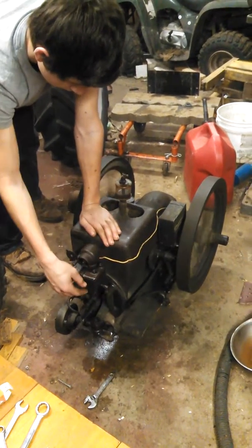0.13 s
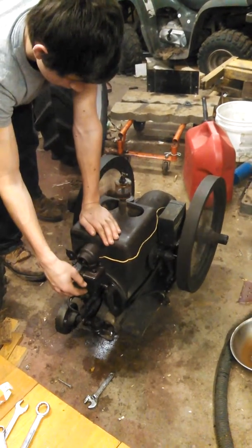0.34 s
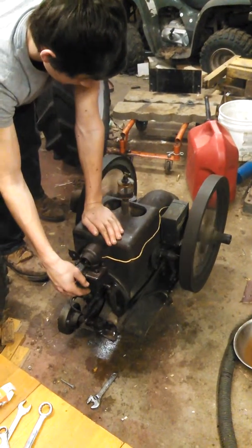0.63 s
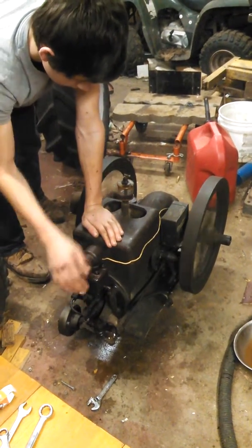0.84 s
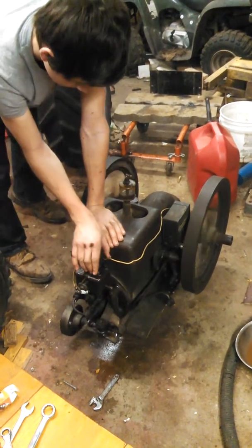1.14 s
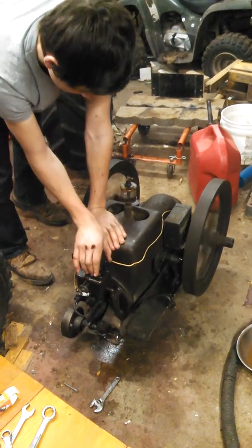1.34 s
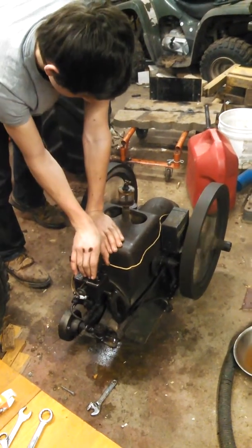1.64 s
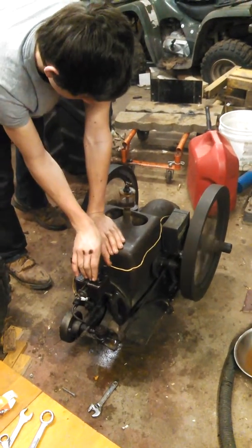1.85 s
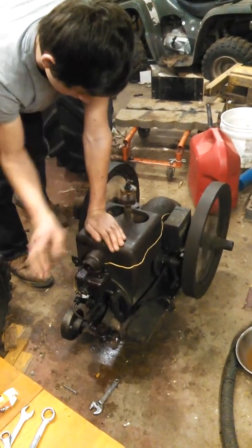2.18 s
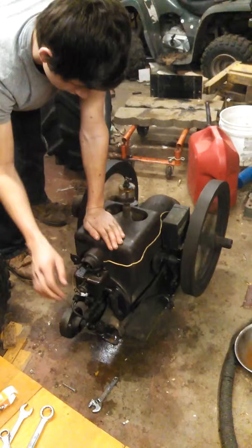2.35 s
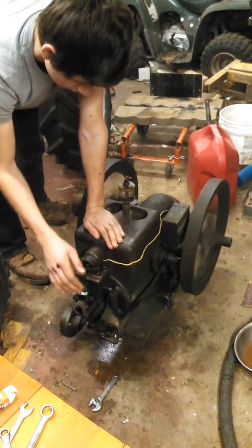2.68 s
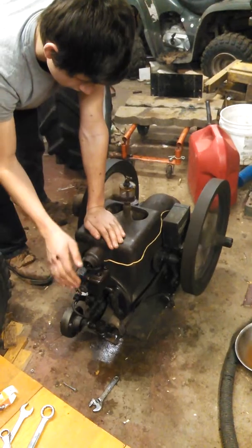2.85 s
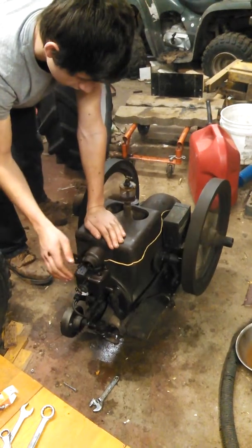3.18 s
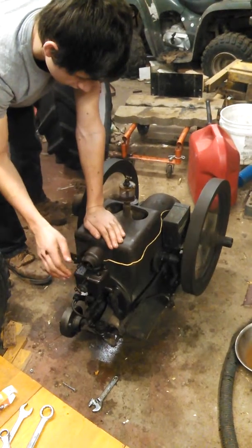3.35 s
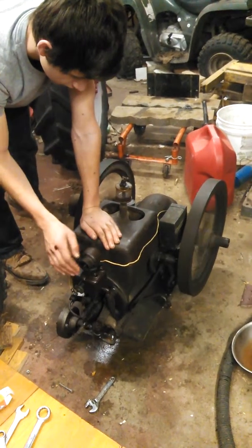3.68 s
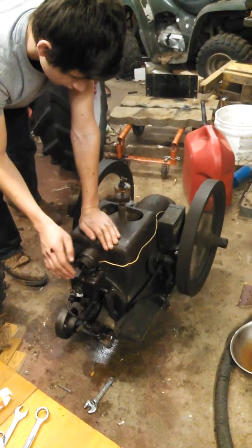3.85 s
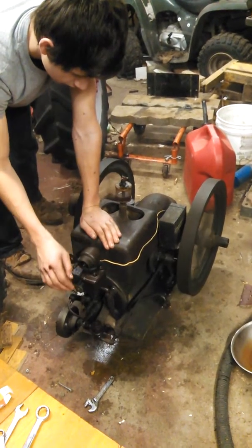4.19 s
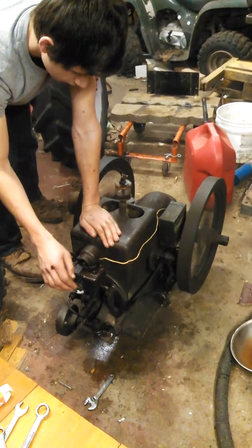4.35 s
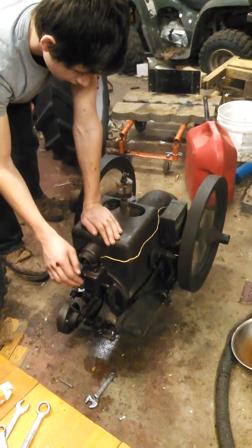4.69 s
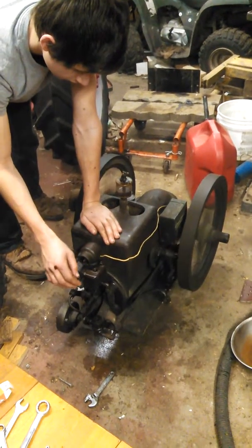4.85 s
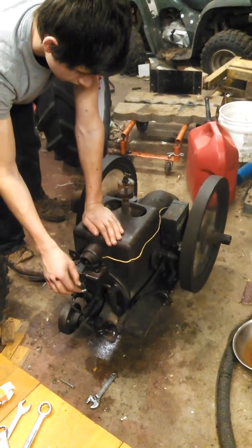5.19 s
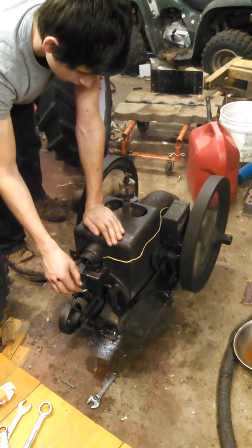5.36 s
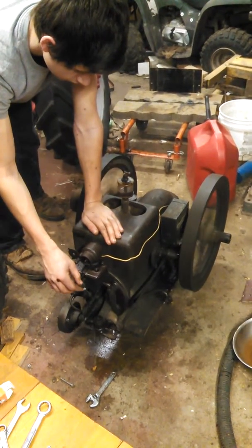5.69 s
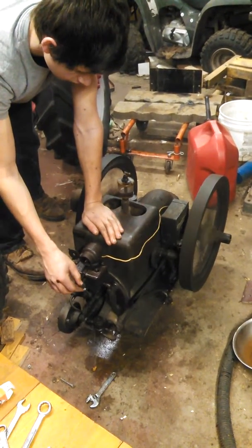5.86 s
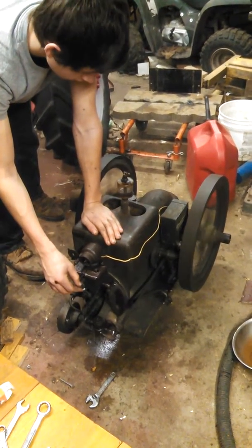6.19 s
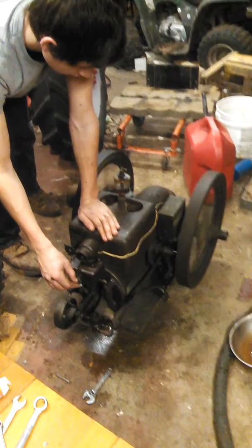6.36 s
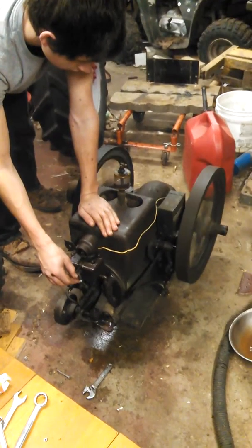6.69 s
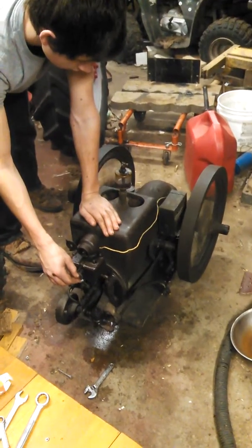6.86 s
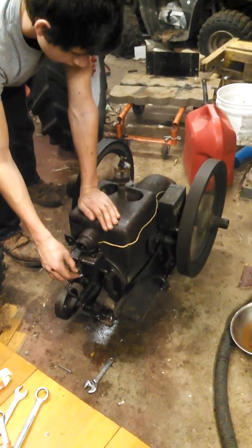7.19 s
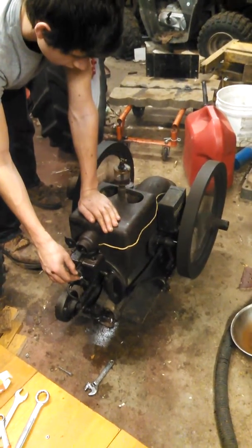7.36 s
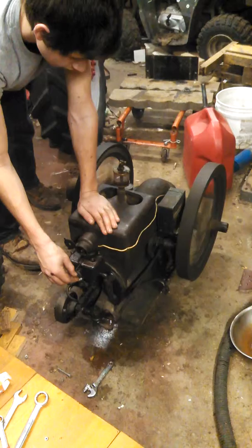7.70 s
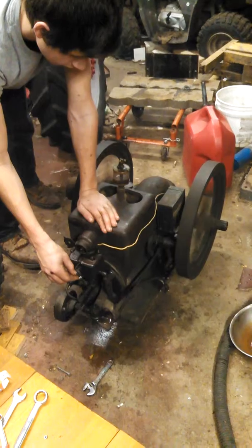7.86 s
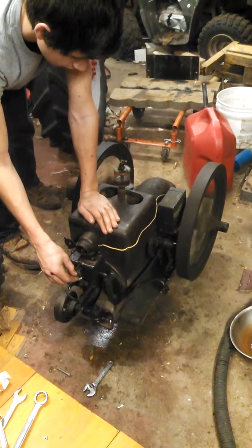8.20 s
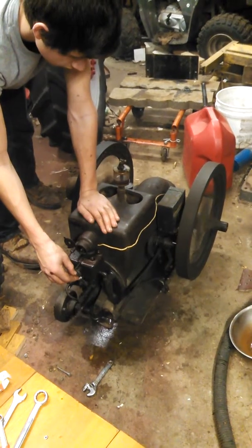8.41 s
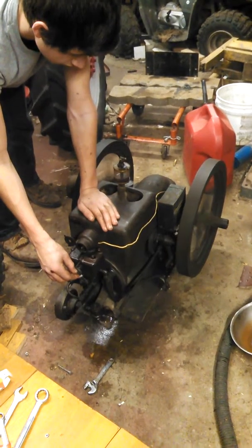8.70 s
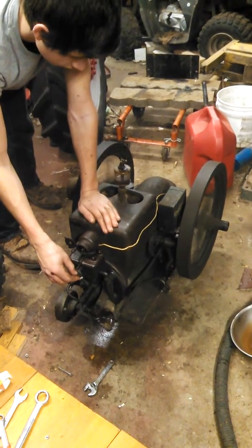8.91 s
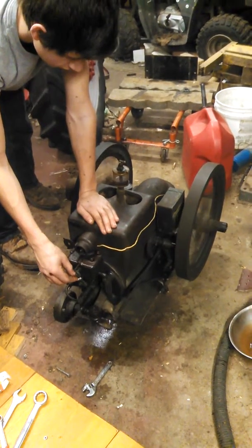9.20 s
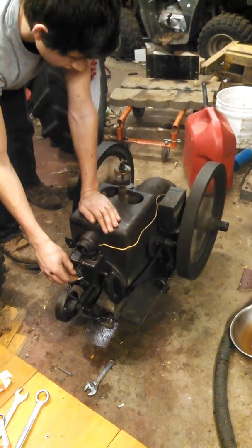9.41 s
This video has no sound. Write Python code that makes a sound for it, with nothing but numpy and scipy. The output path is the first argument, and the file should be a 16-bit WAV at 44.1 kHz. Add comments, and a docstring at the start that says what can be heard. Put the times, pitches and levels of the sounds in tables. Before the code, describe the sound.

Close view of a small old flywheel engine in a hard, echoing garage. Gears rattle, a push rod clacks each turn with a low puff, valves hiss and spit, the intake gulps. It slows for two seconds, then loud dry cracks with iron ringing push it quicker, until it fires only about every fourth cycle. Each crack ducks the clatter, which creeps back.

```python
"""In a garage, a small antique hit-and-miss engine runs on the floor, near a camera.
Once a cycle its valve gear knocks and the exhaust puffs; in some cycles the intake gulps shortly before.
Gears clatter and air hisses at the valves: noise with colour and ringing. Puffs and gulps are short swings of pressure.
The flywheel coasts and slows, then sharp firings kick it up to speed, and it ends firing every fourth cycle.
Loud cracks duck the camera's gain, so the clatter drops away and swells back between firings."""
import sys
import numpy as np
from scipy import signal
from scipy.fft import rfft, irfft, next_fast_len
from scipy.io import wavfile
from scipy.ndimage import uniform_filter1d, map_coordinates

SR = 44100
rng = np.random.default_rng(int(sys.argv[2]) if len(sys.argv) > 2 else 0)


def wav_out(sig):
    """Save sig, one row per channel (or a flat mono array), as 16-bit PCM at SR to the path in sys.argv[1]."""
    wavfile.write(sys.argv[1], SR, np.round(np.clip(np.atleast_2d(sig).T, -1, 1) * 32767).astype(np.int16))


N = 420713
TIME = np.arange(N) / SR

# All levels are relative: the functions below still weigh and mix them.

# room echo: [f/Hz, time to fall by 60 dB/s]
ROOM_DECAY = [(80, 0.34), (300, 0.43), (1500, 0.36), (4000, 0.21), (8000, 0.24), (15000, 0.15)]
# steady gear clatter: [t/s, level/dB]
CLATTER_LEVEL = [(0, -32), (1.7, -31.5), (2.3, -34), (3.0, -31), (4.4, -28.5), (7.4, -29), (9.5, -29.5)]
# colour of the gear clatter: [f/Hz, level per Hz/dB]
GEAR_COLOUR = [(30, -42), (48, -50), (72, -3.5), (110, -2), (150, -0.5), (260, 1), (480, -7), (800, -3),
               (1400, -7.5), (2000, -4.5), (4500, -17), (7000, -17), (10000, -29.5), (15000, -27.5)]
# resonances of gears and casting: [f/Hz, width/Hz, level/dB]
CASTING_MODES = [(420.4, 21, -4), (630, 9.8, -10.5), (840, 26, -11), (997, 58, -13), (1212, 30, -8.5),
                 (1342, 62, -3), (1385, 91, -2), (1670, 15, -7), (1937, 29, -9), (2370, 160, -2.5),
                 (5136, 220, 5.5)]
# slack in the linkage, taken up in every cycle: [part of a cycle after the knock, level/dB]
SLACK_TICKS = [(0.583, -33), (.635, -38.5), (.79, -34.5)]
# air leaking past the valves, swelling until 4.3 s and then dying away:
# [t/s, hiss level/dB, fine spray level/dB]
LEAK_LEVEL = [(0, -39, -50), (1.1, -37, -44), (2.3, -37.5, -41), (4.298, -30.5, -36), (4.8, -33.5, -48),
              (9.5, -42.5, -54)]
# spits of fine spray at the intake, long while a hand covers it: [t/s, level/dB, length/s]
INTAKE_SPRAYS = [(1.35, -36.5, 0.076), (1.696, -35, 0.081), (2.046, -34, 0.055), (3.859, -26, .008)]
# colours of hissing air and of a fine spray of air: [f/Hz, level per Hz/dB]
HISS_COLOUR = [(1000, -13), (3000, 0), (4500, 3), (6500, -0.5), (8000, -4.5), (10000, -13.5), (12500, -45),
               (15000, -40)]
SPRAY_COLOUR = [(3000, -17), (8000, 7.5), (10500, -9.5), (12500, 1.5), (15000, 3)]
# sharp spits of air as a valve lifts or seats: [t/s, level/dB]
VALVE_SPITS = [(.044, -32.5), (.06, -30), (.133, -37), (0.159, -34.5), (.357, -30), (.381, -30),
               (.473, -34), (.672, -28.5), (.692, -25), (.766, -37), (.795, -29), (1.006, -34),
               (1.027, -29.5), (1.128, -32), (1.441, -34), (1.473, -34.5), (1.829, -30.5), (2.08, -24.5),
               (2.347, -31), (2.648, -24.5), (2.935, -27), (3.214, -22.5), (3.482, -24), (3.741, -25),
               (3.989, -27), (4.226, -22.5), (4.461, -28)]
# colour of those spits: [f/Hz, level per Hz/dB]
SPIT_COLOUR = [(1500, -30), (4000, 0), (6500, 3.5), (8000, -1.5), (10000, -18), (12500, -23), (15000, -18)]
# gulps of the intake valve: [t/s, level/dB]
INTAKE_GULPS = [(.196, -21), (.514, -22), (.834, -20.5), (1.17, -30), (1.51, -24), (2.183, -31),
                (4.34, -23.5), (4.785, -24), (5.229, -26), (7.05, -23)]
# colour of the air drawn in: [f/Hz, level per Hz/dB]
DRAW_COLOUR = [(90, -28), (170, -8), (340, -10), (500, -15.5), (1500, -11.5), (4000, -20), (12000, -64)]
# strokes of the valve gear, one a cycle: [t/s, knock level/dB, exhaust puff level/dB]
STROKES = [(-.012, -26.5, -21.5), (.286, -25.5, -19.5), (.604, -24, -18), (0.931, -23.5, -15),
           (1.268, -26, -16), (1.618, -25.5, -16.5), (1.961, -28, -21), (2.275, -26, -20.5),
           (2.575, -25, -21.5), (2.872, -27, -20), (3.155, -23, -20), (3.423, -24.5, -19.5),
           (3.684, -25, -22.5), (3.935, -24, -21), (4.177, -21.5, -21.5), (4.407, -22.5, -21),
           (4.634, -24, -29), (4.853, -22.5, -21), (5.07, -23.5, -19.5), (5.279, -22.5, -24),
           (5.485, -23.5, -21), (5.692, -22, -24.5), (5.895, -25.5, -28), (6.099, -24, -24),
           (6.297, -24, -27), (6.497, -23, -24.5), (6.698, -25.5, -29), (6.899, -24.5, -23.5),
           (7.105, -24.5, -20.5), (7.309, -23, -25), (7.514, -23.5, -24), (7.723, -25, -25),
           (7.929, -24, -27), (8.139, -23, -26), (8.348, -22.5, -28), (8.558, -26, -23.5),
           (8.765, -23.5, -25), (8.976, -24.5, -26), (9.189, -23, -24.5), (9.404, -28, -30)]
# one stray knock just before the engine catches: [t/s, level/dB]
LONE_KNOCK = (1.846, -30.5)
# colour of a knock: [f/Hz, level per Hz/dB]
KNOCK_COLOUR = [(60, -43), (150, 0), (480, -3.5), (750, 5), (1400, -1), (1800, -1.5), (2400, -3),
                (3200, -3.5), (5000, -18.5), (8000, -38), (15000, -44)]
# resonances of the exhaust passage and floor: [f/Hz, width/Hz, level/dB]
PIPE_MODES = [(73.5, 7.2, 0.5), (89, 8.6, 4.5), (131.2, 12, 1.5), (158.6, 21, -1), (196.4, 42, -1.5),
              (316, 44, 0)]
# firings: [t/s, speed gained/(cycles per s), crack level/dB, time the gas takes to blow out/s,
# ring level/dB, f of the strongest ring/Hz, whistle level/dB]
FIRING_EVENTS = [(1.88, .532, -7, .016, -23, 3880, -30), (2.511, 0.37, -7, .018, -19, 4280, -33),
                 (3.087, 0.39, -8, 0.021, -10.5, 4255, -12), (3.624, 0.46, -7, .019, -11.5, 3750, -27),
                 (4.12, 0.42, -6, .019, -11, 3970, -8.5), (4.58, 0.41, -6, .02, -11, 4300, -11),
                 (5.015, 0.3, -6.5, .019, -11, 3650, -26), (5.436, .211, -4.5, 0.014, -22, 4300, -25),
                 (5.842, 0.16, -7, 0.014, -11, 4260, -16), (6.245, .128, -6.5, 0.013, -11.5, 4240, -28),
                 (6.648, .071, -6, .014, -13, 3850, -31), (7.667, 0.11, -5.5, .012, -6.5, 4300, -26),
                 (8.503, .1626, -6.5, 0.014, -10, 4400, -32), (9.349, 0.13, -6, .014, -12, 4270, -24)]
# iron ringing under each crack: [f/Hz, width/Hz, level/dB]
IRON_MODES = [(1840, 120, -11), (3240, 18, -11), (3470, 37, -4), (3696, 27, -2.5), (3806, 38, -1.5),
              (3980, 35, -1), (4270, 55, 3), (4344, 58, 0), (4990, 62, -2)]
# colours of the crack and of the snap that opens it: [f/Hz, level per Hz/dB]
CRACK_COLOUR = [(100, -21), (300, -1.5), (900, -1), (1800, 2), (2400, -2), (3000, 6), (4200, 2), (5200, 8),
                (7000, -1.5), (8500, -8), (10000, -12.5), (12500, -12.5), (15200, -22)]
SNAP_COLOUR = [(300, -12), (2000, -16), (3500, -4.5), (4300, 3), (5000, 1), (7000, -12), (12000, -25),
               (15000, -27)]
# cavities of the cylinder head, which bark as the gas leaves: [f/Hz, width/Hz, level/dB]
HEAD_MODES = [(676, 130, -5), (1580, 300, -0.5), (1885, 230, 3)]
# the gap that the gas whistles through: [f/Hz, width/Hz, level/dB]
GAP_MODES = [(6930, 55, 0)]
# stereo image: [f/Hz, turn from sum to difference/radians]
STEREO_TURN = [(0, -0.99), (150, -0.25), (500, -0.68), (1000, -0.29), (1378, 0.042)]

# flywheel at the start: cycles per s, and part of a cycle since the last knock
START_SPEED, START_PHASE = 3.274, .077
# speed lost to friction, and extra loss until the first firing (cycles per s, each second)
FRICTION, COLD_DRAG = .2356, .051
# where in the cycle air leaks past the valves (part of a cycle after the knock)
LEAK_PHASE = 0.23
# loose fittings: chinks a second; level over the clatter and its full range (dB)
CHINKS_PER_S, CHINK_DB, CHINK_RANGE_DB = 55, -1.5, 11.5
# their middle pitch (Hz), furthest stray from it (octaves), time to fall by 60 dB (s)
CHINK_HZ, CHINK_MAX_OCTAVES, CHINK_T60_S = 2001, 1.5, 0.041
# a gulp: pitch of each flap (Hz), time between flaps and their scatter (s), level (dB)
GULP_HZ, FLAP_S, FLAP_SCATTER_S, FLAP_DB = 236, .0052, 0.00091, -1.5
# how much the modes near the strongest ring stand out (dB), and how far that reaches (Hz)
FOCUS_DB, FOCUS_WIDTH_HZ = 8, 240
# the valve slaps back as the gas runs out: part of the blow-out time,
# level under the first ring (dB), its pitch over the first ring's
RESEAT_SHARE, RESEAT_DB, RESEAT_PITCH = .8, -8, .87
# cavity pitch sinks as the pressure falls: size (part of the pitch) and time (s)
SAG, SAG_S = .18, .02
# gain control: level it holds (dB), recovery (dB per s), averaging and attack times (s)
LIMIT_DB, RECOVER_DB_PER_S, SENSE_S, ATTACK_S = -13.5, 7, 0.0027, 0.0002
# stereo: spacing of the swings and top of the camera's range (Hz)
COMB_HZ, TOP_HZ = 2756, 15380


def amp(db):
    """Turn decibels into gain."""
    return 10 ** (np.asarray(db) / 20)


def unit(x):
    """Scale to an rms of 1."""
    return x / np.sqrt(np.mean(np.abs(x) ** 2) + 1e-20)


def along(points, hz):
    """Read a value between (Hz, value) points, on a log frequency axis."""
    f, v = np.transpose(points)
    return np.interp(np.log(hz + 1), np.log(f + 1), v)


def filtered(x, response):
    """Pass x through a complex response of frequency."""
    m = next_fast_len(N + SR)
    spectrum = rfft(x, m) * response(np.fft.rfftfreq(m, 1 / SR))
    return irfft(spectrum, m)[..., :N]


def resonances(modes, hz):
    """Sum of resonators, each ringing only after it is struck: rows of (Hz, width Hz, dB)."""
    return sum(amp(db) * 1j * hz * w / (c * c - hz * hz + 1j * hz * w) for c, w, db in modes)


def coloured(x, spectrum, modes=(), ring_db=0):
    """Give white noise a colour and ringing modes that never sound early, keeping its power."""
    def response(hz):
        # folding the cepstrum gives the colour its minimum phase
        cepstrum = irfft(np.log(amp(along(spectrum, hz))))
        half = len(cepstrum) // 2
        cepstrum[1:half] *= 2
        cepstrum[half + 1:] = 0
        colour = np.exp(rfft(cepstrum))
        return unit(colour * (1 + amp(ring_db) * resonances(modes, hz)))
    return filtered(x, response)


def add(track, s, sound):
    """Mix a sound into the track from time s."""
    start = round(s * SR)
    part = sound[max(-start, 0):max(N - start, 0)]
    track[max(start, 0):][:len(part)] += part


def bursts(rows, rise, fall):
    """Loudness curve of (s, dB, length s) bursts: open, hold, then lose 60 dB in fall seconds."""
    envelope, t = np.zeros(N), np.arange(SR // 3) / SR
    for s, db, length in rows:
        die_away = amp(db - 60 * np.maximum(t - length, 0) / fall)
        add(envelope, s, die_away * (1 - np.exp(-t / rise)))
    return envelope


def grit(rate, share):
    """White noise, a share of its power made of tiny impacts at about rate a second."""
    impacts = (rng.random(N) < rate / SR) * rng.standard_normal(N)
    share = np.clip(share, 0, 1)
    return np.sqrt(share) * unit(impacts) + np.sqrt(1 - share) * rng.standard_normal(N)


def flutter(rate, depth_db):
    """A gain that wanders between random values, rate of them a second."""
    knots = rng.standard_normal(int(N * rate / SR) + 4)
    return unit(amp(depth_db * map_coordinates(knots, [TIME * rate], order=1)))


def pushes(rows, hz, delay):
    """One short, quickly fading swing of air pressure for each (s, dB)."""
    track, t = np.zeros(N), np.arange(SR // 20) / SR
    swing = np.sin(2 * np.pi * hz * t) * hz * t * np.exp(2.4 - 3.2 * hz * t)
    for s, db in rows:
        add(track, s + delay, amp(db) * swing)
    return track


def blown(envelope, modes):
    """Rushing gas sounds the modes of a cavity, sinking in pitch after each firing."""
    starts = np.array([s for s, *_ in FIRING_EVENTS])
    age = np.abs(TIME - starts[np.searchsorted(starts, TIME) - 1])
    pitch = 1 + SAG * (np.exp(-age / SAG_S) - .5)
    tone = filtered(rng.standard_normal(N), lambda hz: unit(resonances(modes, hz)))
    # reading the tone faster or slower bends its pitch
    return envelope * map_coordinates(tone, [np.cumsum(pitch)], mode="mirror")


def flywheel():
    """Time, speed and cycles done: friction slows the wheel steadily and every firing kicks it on."""
    step = .001  # s
    t = np.arange(-100, N / SR / step + 300) * step
    kicks = sum(kick * np.clip((t - s) / (10 * step) + .5, 0, 1) for s, kick, *_ in FIRING_EVENTS)
    first_firing = FIRING_EVENTS[0][0]
    speed = START_SPEED - FRICTION * t - COLD_DRAG * np.minimum(t, first_firing) + kicks
    turn = np.cumsum(speed) * step
    return t, speed, turn - np.interp(0, t, turn) + START_PHASE


def cycle_length(s):
    """Seconds that one cycle takes at time s, from the wheel's speed."""
    t, speed, _ = flywheel()
    return 1 / np.interp(s, t, speed)


def each_cycle(phase):
    """The times at which the wheel passes one place in its cycle."""
    t, _, turn = flywheel()
    return np.interp(np.arange(int(turn[-1])) + phase, turn, t)


def garage(x, wet_db):
    """Direct sound plus a drifting room echo, slightly alike left and right in the bass only."""
    clumps = flutter(300, depth_db=2.8)[:SR // 2]  # clutter returns the sound in uneven clumps
    noise = clumps * rng.standard_normal((2, 2, SR // 2))  # two tails, each with two channels
    hz, t, z = signal.stft(noise, SR, nperseg=256)
    alike = (0.15 * np.exp(-hz / 600))[:, None].clip(0, 1)
    z[:, 1] = alike * z[:, 0] + np.sqrt(1 - alike ** 2) * z[:, 1]
    decay = amp(-60 * t / along(ROOM_DECAY, hz)[:, None])
    tails = signal.istft(z * decay, SR, nperseg=256)[1]
    tails = tails / np.linalg.norm(tails[0, 0])
    tails = np.pad(tails, ((0, 0), (0, 0), (round(.004 * SR), 0)))  # echoes start late
    drift = 2 * np.pi * .7 * TIME  # swings between the two tails
    shares = x * np.array([np.cos(drift), np.sin(drift)])
    echo = signal.fftconvolve(shares[:, None], tails, axes=2).sum(0)[:, :N]
    return x + amp(wet_db) * echo


def clatter():
    """Gears and bearings rattle all the time, swelling as the cam takes up its load; slack ticks."""
    t, _, turn = flywheel()
    load = amp(1.8 * np.cos(2 * np.pi * (np.interp(TIME, t, turn) - .85)))
    level = amp(np.interp(TIME, *np.transpose(CLATTER_LEVEL)))
    rattle = level * load * flutter(90, depth_db=2.0) * grit(350, share=0.41)
    gears = coloured(rattle, GEAR_COLOUR, CASTING_MODES, ring_db=4.5)
    ticks = [(s, db + 2.3 * rng.normal(), .009) for phase, db in SLACK_TICKS for s in each_cycle(phase)]
    slack = bursts(ticks, rise=0.00029, fall=0.031)
    return gears + coloured(slack * grit(1500, share=0.24), HISS_COLOUR)


def loose_parts():
    """Loose fittings chink and bump at random as the engine shakes; each chink has three partials."""
    metal, t = np.zeros(N), np.arange(SR // 12) / SR
    chance = rng.random((int(CHINKS_PER_S * N / SR), 8))
    times = chance[:, 0] * N / SR
    clatter_db = np.interp(times, *np.transpose(CLATTER_LEVEL))
    sizes = clatter_db + CHINK_DB - CHINK_RANGE_DB * (chance[:, 1] - .5)
    pitches = CHINK_HZ * 2 ** (CHINK_MAX_OCTAVES * (chance[:, 2::2] - chance[:, 3::2]))
    for s, db, hz in zip(times, sizes, pitches):
        partials = np.sin(2 * np.pi * hz[:, None] * t).sum(0)
        add(metal, s, amp(db - 60 * t / CHINK_T60_S) * partials)
    bumps = list(zip(times, sizes - 1.5))[::6]  # every sixth chink also bumps
    return metal + pushes(bumps, hz=263, delay=0)


def valve_air():
    """Air leaks past the valves once a cycle as noise bursts; fine spray also spits at the intake."""
    when, hiss_db, spray_db = np.transpose(LEAK_LEVEL)
    leaks = each_cycle(LEAK_PHASE)
    hiss_rows = [(s, np.interp(s, when, hiss_db), 0.13 * cycle_length(s)) for s in leaks]
    spray_rows = [(s, np.interp(s, when, spray_db), .02) for s in leaks] + INTAKE_SPRAYS
    hiss = bursts(hiss_rows, rise=0.0016, fall=0.27) * grit(3000, share=0.37)
    fine = bursts(spray_rows, rise=0.011, fall=0.11) * grit(4800, share=.3)
    return coloured(hiss, HISS_COLOUR) + coloured(fine, SPRAY_COLOUR)


def spits():
    """Air spits past a valve seat: abrupt, high bursts of gritty noise."""
    envelope = bursts([(s, db, .007) for s, db in VALVE_SPITS], rise=0.00059, fall=0.04)
    return coloured(envelope * grit(2500, share=0.46), SPIT_COLOUR)


def intake():
    """The intake valve flaps four times in a short low gulp, and air snorts in behind it."""
    scatter = rng.standard_normal((len(INTAKE_GULPS), 4))
    flaps = []
    for (s, db), row in zip(INTAKE_GULPS, scatter):
        for k, late in enumerate(row):
            flaps.append((s + FLAP_S * (k + 1) + FLAP_SCATTER_S * late, db + FLAP_DB))
    snorts = [(s + 0.0052, db - 10.5, .025) for s, db in INTAKE_GULPS]
    draw = bursts(snorts, rise=0.0037, fall=0.09) * rng.standard_normal(N)
    return pushes(flaps, hz=GULP_HZ, delay=0) + coloured(draw, DRAW_COLOUR)


def exhaust():
    """The opening valve lets out a puff that booms in the passage and returns off a near wall."""
    puff = pushes([(max(s, 0), db) for s, _, db in STROKES], hz=165.6, delay=0.0031)

    def passage_and_wall(hz):
        wall = 1 + 0.68 * np.exp(-2j * np.pi * hz * 0.0133)  # echo 13.3 ms later
        return wall * (amp(-11.0) + amp(8) * resonances(PIPE_MODES, hz))
    return filtered(puff, passage_and_wall)


def valve_gear():
    """The push rod strikes once a cycle: a hard clack, then the linkage rattles on the casting."""
    knocks = [(s, db) for s, db, _ in STROKES] + [LONE_KNOCK]
    clack = bursts([(s + 0.00078, db + 8, .006) for s, db in knocks], rise=0.0029, fall=0.043)
    rattle = bursts([(s, db + .3, .022) for s, db in knocks], rise=0.0041, fall=0.16)
    tick = bursts([(s - .001, db - 2, .003) for s, db in knocks], rise=0.00034, fall=0.043)
    iron = clack * grit(3000, share=0.08) + rattle * grit(500, share=0.32)
    body = coloured(iron, KNOCK_COLOUR, CASTING_MODES, ring_db=2.5)
    return body + coloured(tick * grit(3000, share=0.31), HISS_COLOUR)


def iron_ring():
    """Each firing jolts the iron into fading tones, and the valve slaps back with a lower ring."""
    ring, t = np.zeros(N), np.arange(SR // 4) / SR
    hz, width, level = np.transpose(IRON_MODES)[:, :, None]
    jolts, slaps = [], []
    for s, _, _, blow, db, centre_hz, _ in FIRING_EVENTS:
        jolts.append((s, db, centre_hz))
        slaps.append((s + RESEAT_SHARE * blow, db + RESEAT_DB, RESEAT_PITCH * centre_hz))
    for s, db, centre_hz in jolts + slaps:
        # strengths and tuning are new every time
        strength, detune, phase = rng.standard_normal((3, len(IRON_MODES), 1))
        focus_db = FOCUS_DB * np.exp(-((hz - centre_hz) / FOCUS_WIDTH_HZ) ** 2)
        decay = amp(level + focus_db + 1.5 * strength) * np.exp(-np.pi * width * t)
        modes = decay * np.sin(2 * np.pi * ((hz + detune * width * 0.37) * t + phase))
        add(ring, s + 0.000997, amp(db) * modes.sum(0) * (1 - np.exp(-t / 0.0016)))
    return ring


def firings():
    """A snap, then gas sputters out: a slow blow-out is long and barking, a quick one short and hard."""
    cracks = [(s, db, blow) for s, _, db, blow, *_ in FIRING_EVENTS]
    jet = bursts([(s + 0.00089, db - 3.5 + 308 * blow, blow) for s, db, blow in cracks],
                 rise=0.012, fall=0.027)
    fine = bursts([(s + 0.0035, db - 32.5 + 385 * blow, .011) for s, db, blow in cracks],
                  rise=0.0098, fall=0.015)
    snap = bursts([(s + 0.0011, db + 14 - 1200 * blow, .0015) for s, db, blow in cracks],
                  rise=0.00064, fall=0.015)
    bark = bursts([(s + 0.0061, db - 28.5 + 1050 * blow, .024) for s, db, blow in cracks],
                  rise=0.0056, fall=0.06)
    whistle = bursts([(s + 0.0059, db, .012) for s, *_, db in FIRING_EVENTS], rise=0.0049, fall=0.018)
    sputter = flutter(700, depth_db=2.5)
    crack = coloured(jet * sputter * grit(3300, share=0.14), CRACK_COLOUR)
    crack += coloured(snap * grit(4400, share=0.12), SNAP_COLOUR, IRON_MODES, ring_db=-7)
    spray = coloured(fine * sputter * grit(2500, share=0.17), SPRAY_COLOUR)
    thump = pushes([(s, 0) for s, *_ in FIRING_EVENTS], hz=237, delay=-0.00058)
    return (amp(4.5) * crack + amp(32) * spray + blown(whistle, GAP_MODES)
            + blown(bark, HEAD_MODES) + amp(-8.5) * thump)


def scene():
    """The engine in its garage; the hidden gear side is heard more by way of the walls."""
    gear_side = amp(2.5) * garage(clatter() + loose_parts(), wet_db=-4.5)
    valves = amp(4.5) * garage(valve_gear() + valve_air() + intake() + spits(), wet_db=-7.5)
    puffs = amp(-5.0) * garage(exhaust(), wet_db=-1.5)
    cracks = garage(firings() + iron_ring(), wet_db=-5)
    return gear_side + valves + puffs + cracks


def gain_control(pair):
    """Sound over the limit turns the gain down almost at once; it then creeps back up."""
    power = np.abs(uniform_filter1d(np.mean(pair ** 2, axis=0), max(round(SENSE_S * SR), 1)))
    excess_db = np.maximum(10 * np.log10(power + 1e-12) - LIMIT_DB, 0)
    # a running maximum on a rising ramp lets each cut fade at the recovery rate
    recovery_db = RECOVER_DB_PER_S * TIME
    cut_db = np.maximum.accumulate(excess_db + recovery_db) - recovery_db
    keep = np.exp(-1 / (ATTACK_S * SR))
    return pair * amp(-signal.lfilter([1 - keep], [1, -keep], cut_db))


def record(dry):
    """The camera widens its stereo by frequency, trims deep bass and extreme treble, rides the gain."""
    def turn(hz):
        # swings between sum and difference along the frequency axis
        return np.interp(hz, *np.transpose(STEREO_TURN)) + np.pi * np.maximum(hz / COMB_HZ - .5, 0)
    mid = filtered(dry[0], lambda hz: np.cos(turn(hz)) - .012j)
    side = filtered(dry[1], lambda hz: 1j * np.sin(turn(hz)) - .05) - 0.013 * mid
    bass_cut = signal.butter(5, 61, "high", fs=SR, output="sos")
    pair = signal.sosfilt(bass_cut, [mid + side, mid - side])
    pair = pair * amp([[-.3], [.3]])  # the right port is a little more sensitive
    return filtered(gain_control(pair), lambda hz: 1 / (1 + (hz / TOP_HZ) ** 100))


dry = scene()
out = record(dry)
wav_out(out)
```